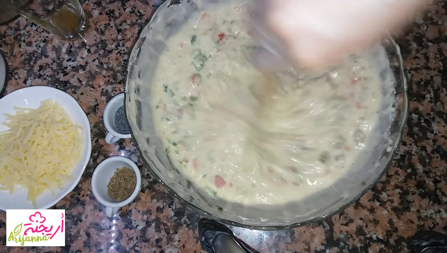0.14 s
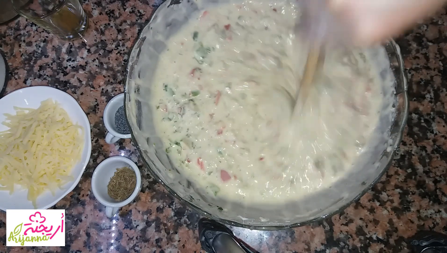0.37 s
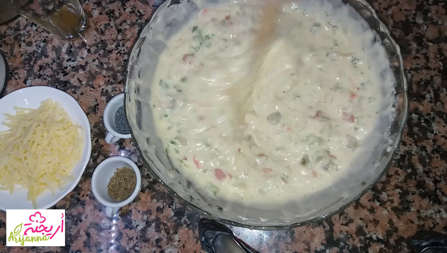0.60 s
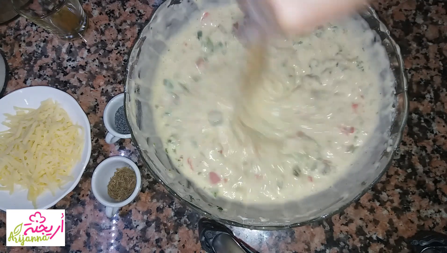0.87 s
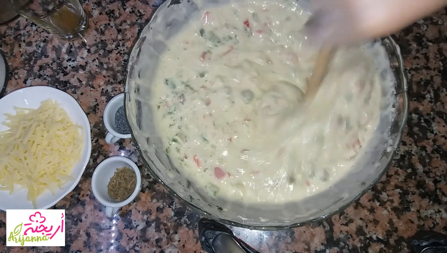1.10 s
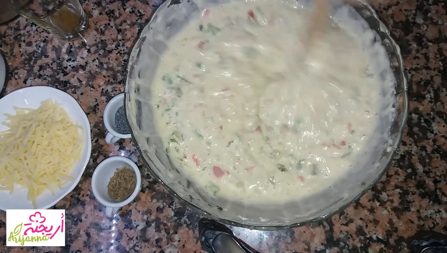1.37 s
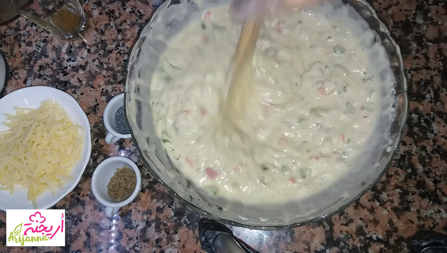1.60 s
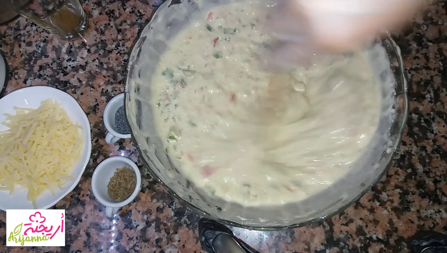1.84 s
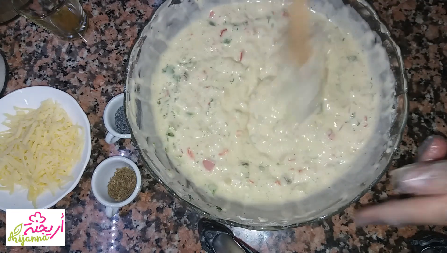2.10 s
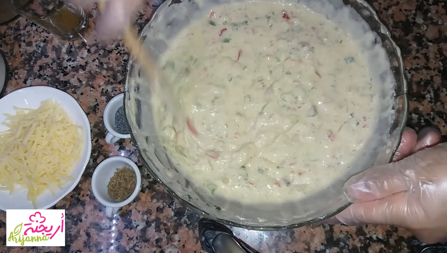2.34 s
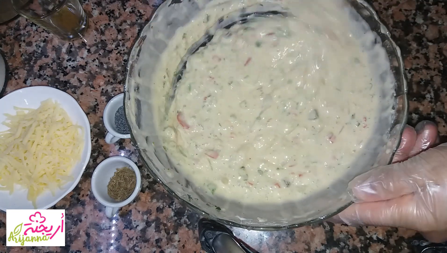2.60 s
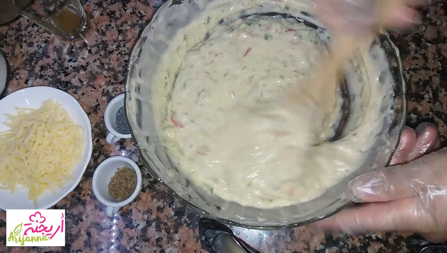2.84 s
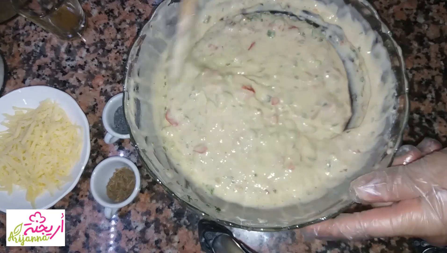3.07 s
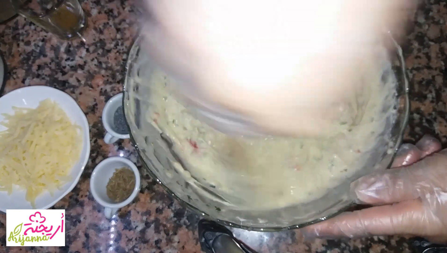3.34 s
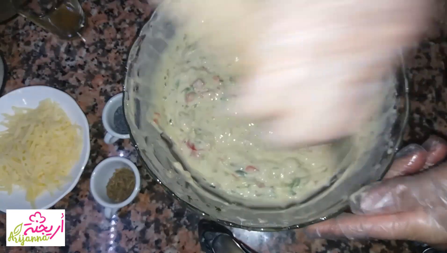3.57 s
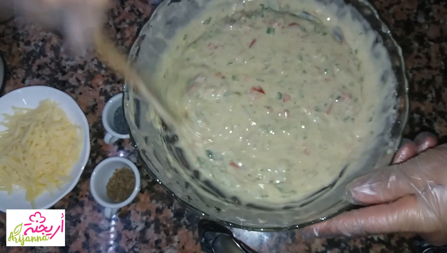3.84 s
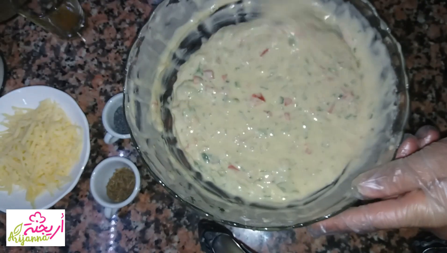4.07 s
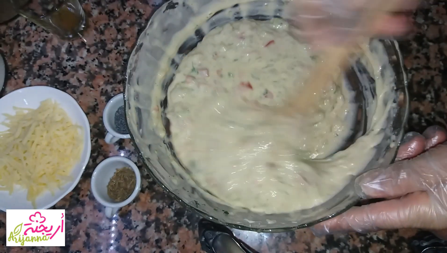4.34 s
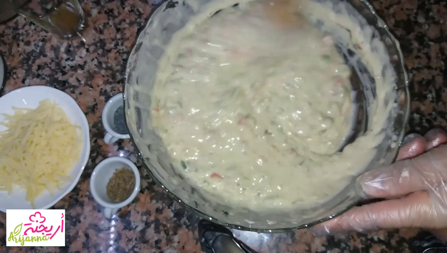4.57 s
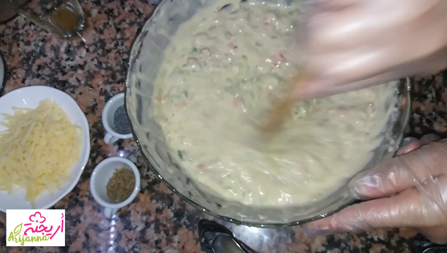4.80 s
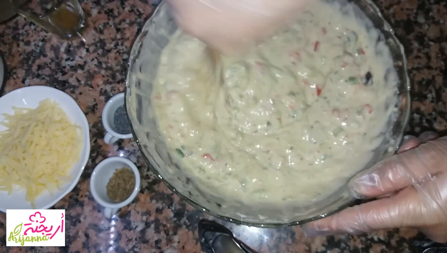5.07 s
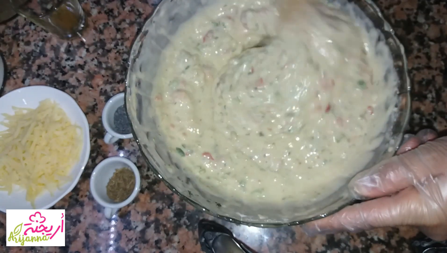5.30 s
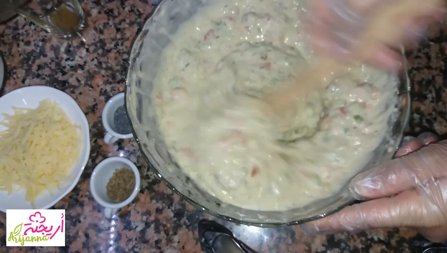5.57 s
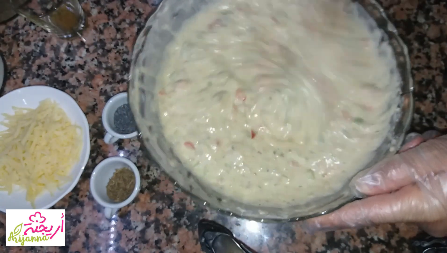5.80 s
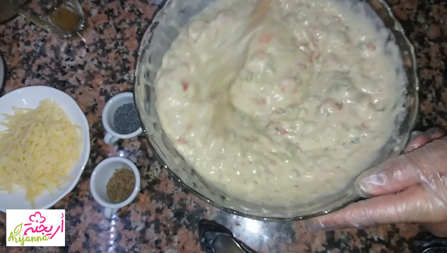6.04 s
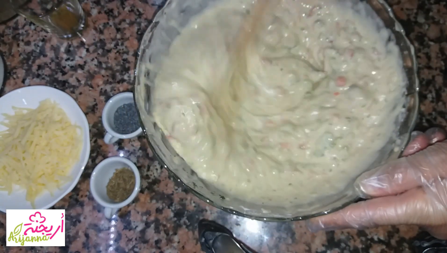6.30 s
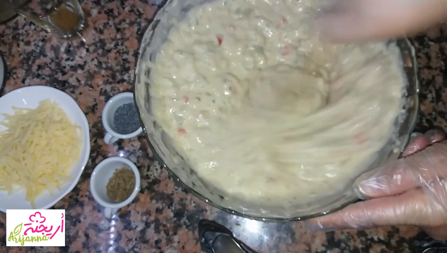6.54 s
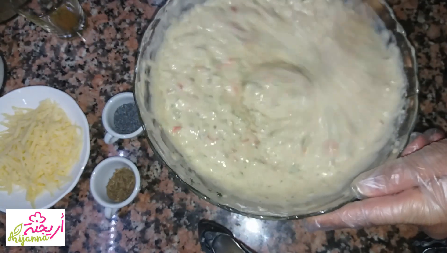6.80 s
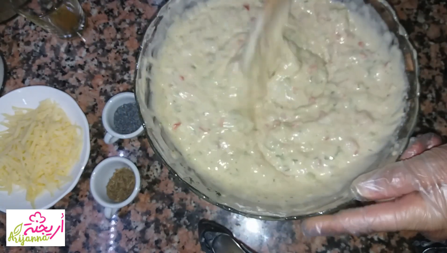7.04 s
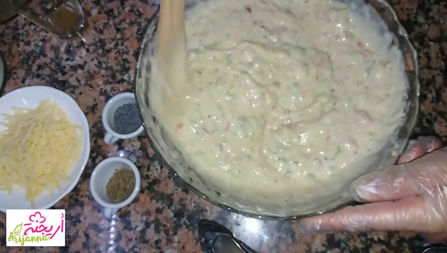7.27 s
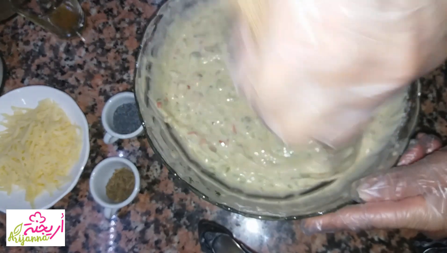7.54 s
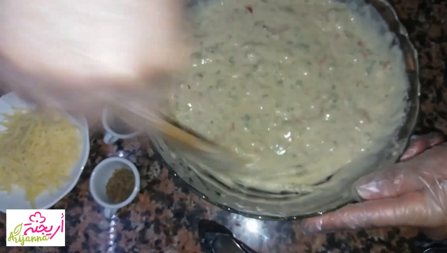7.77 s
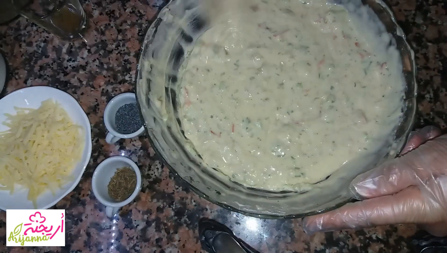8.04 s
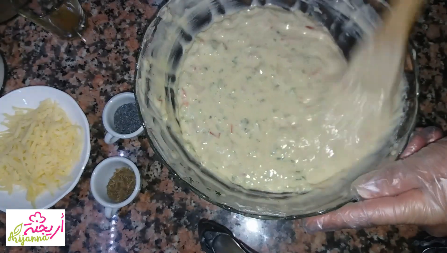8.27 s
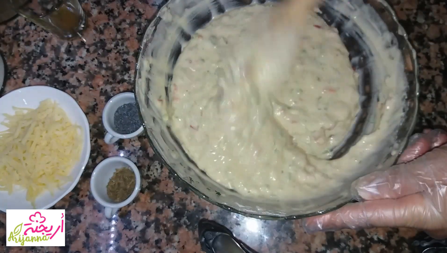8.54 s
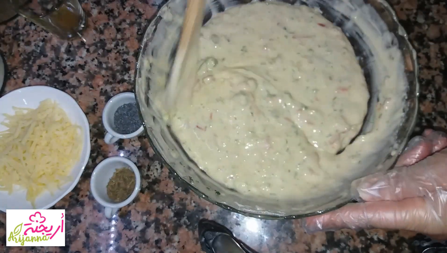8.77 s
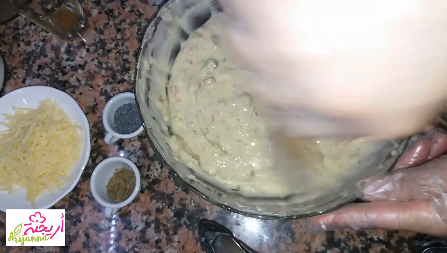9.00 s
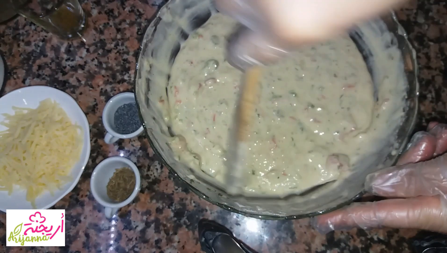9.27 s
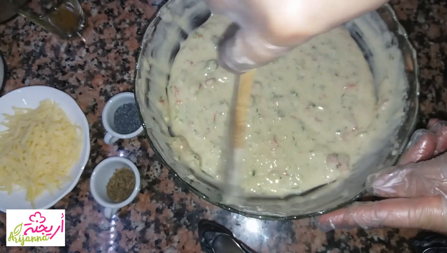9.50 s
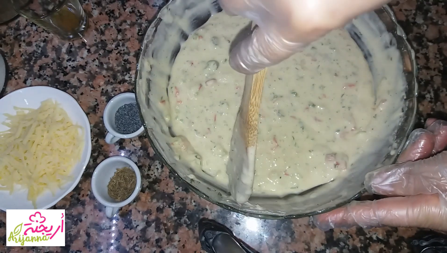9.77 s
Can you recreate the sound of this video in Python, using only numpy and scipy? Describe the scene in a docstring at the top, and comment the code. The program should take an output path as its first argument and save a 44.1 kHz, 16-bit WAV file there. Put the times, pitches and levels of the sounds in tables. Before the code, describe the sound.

A close mono microphone in a small kitchen with short echoes, over a very faint low hush and hum. From 0 to 1.8 s a wooden spoon moves through thick batter almost silently: soft slops, tiny air pops and barely audible touches. A small muffled cluster of knocks comes at 1.9 s. From 2.4 to 2.8 s the spoon rattles along the ribbed glass wall in a quick hollow run. After a pause, denser, harder clacking fills 3.3 to 4.3 s, woody with short glassy ringing. From 4.7 to 6.7 s the stirring turns soft and wet, with dull taps, squelches and bubble pops. A sudden hard double clack lands at 6.9 s, scattered knocks at 7.3 to 7.6 s, then the loudest clattering run at 7.8 to 8.3 s. A smaller rattle at 9.0 to 9.2 s fades to faint touches. Thin plastic glove crackle flickers throughout.

```python
"""Stirring batter in a glass bowl

A wooden spoon stirs thick batter in a fluted glass bowl on a stone counter in a kitchen.
Dragged along the wall, it knocks from rib to rib: short falling wood tones set the modes of the glass ringing.
The batter slops as lumpy filtered noise, and air pockets burst in it as rising pops and faint steady clicks.
A thin plastic glove crackles in clumps of tiny clicks. The kitchen echoes through feedback delays,
over a faint hush of noise, a hum and a thin whistle that comes and goes."""
import sys
import numpy as np
from scipy import signal
from scipy.fft import rfft, irfft, next_fast_len
from scipy.io import wavfile

SR = 44100
rng = np.random.default_rng(int(sys.argv[2]) if len(sys.argv) > 2 else 0)


def gain_from_db(level_db):
    """Convert decibel levels to linear amplitude factors (20 dB per decade)."""
    decades = np.asarray(level_db, float) / 20
    return 10 ** decades


def dump(signal):
    """Clip the signal to [-1, 1] and save it as 16-bit WAV at the path in sys.argv[1]."""
    limited = np.clip(np.atleast_2d(signal).T, -1, 1)
    pcm = np.round(limited * 32767).astype(np.int16)
    wavfile.write(sys.argv[1], SR, pcm)


N = 435708  # length of the scene in samples

# Spoon on glass, mostly a blow on a rib and a quick second touch:
# (time [s], relative level [dB], pitch the wood settles to [Hz])
SPOON_KNOCKS = [(0.0302,-44.5,1080),(0.636,-56,1170),(0.667,-54,1130),(1.386,-51,1120),(1.4105,-42.5,1236),(1.5962,-43,890),(1.655,-38,1670),(1.6823,-40,1080),
                (1.8617,-31.5,740),(1.872,-23.5,1018),(1.8883,-19,978),(1.901,-26,901),(2.035,-36,1190),
                (2.3677,-26.5,1020),(2.393,-33,1060),(2.434,-22.5,1140),(2.4546,-14,1280),(2.4867,-12,1340),(2.505,-10,1400),
                (2.5356,-10.5,1480),(2.5566,-16,1030),(2.5954,-17.5,1190),(2.6176,-18.5,1020),(2.6462,-10,1060),(2.6626,-10,1115),
                (2.6872,-12,1130),(2.7018,-13,870),(2.7263,-10,940),(2.7395,-16.5,954),(2.7678,-14.5,893),(2.785,-18,880),(3.016,-30.5,2940),(3.178,-45,1100),
                (3.2791,-20,1076),(3.3254,-18,904),(3.364,-17.5,1010),(3.3786,-7.5,1002),(3.4058,-10.5,1280),(3.423,-9.5,1190),
                (3.45,-10,1245),(3.4698,-15,1010),(3.495,-4.5,1040),(3.514,-29,1060),
                (3.6345,-11.5,1400),(3.678,-15,1370),(3.6989,-7.5,1500),(3.73,-7.5,1570),(3.745,-13,1150),(3.772,-11,2300),
                (3.7864,-8.5,2330),(3.814,-12.5,1750),(3.8311,-11,1100),(3.8619,-11,1190),(3.8798,-6,2210),(3.9027,-11.5,1383),
                (3.9622,-7.5,1270),(3.9777,-10.5,1260),(4.012,-8,1280),(4.039,-20,1290),(4.0685,-6.5,1250),(4.082,-7,1210),
                (4.1063,-8.5,1080),(4.15,-11,1040),(4.1919,-6,1000),(4.2065,-10,956),(4.231,-6.5,962),(4.245,-10,857),
                (4.293,-17,1450),(4.3426,-19,1416),(4.3774,-18,1350),(4.4626,-40,1650),
                (4.726,-37,1126),(4.8497,-24,730),(4.876,-29,530),(4.974,-32,980),(4.9963,-26,923),(5.0409,-23,1020),(5.08,-19.5,1350),
                (5.117,-35,1340),(5.133,-19.5,1320),(5.157,-29,820),(5.181,-49,1210),(5.212,-34.5,623),(5.28,-23,1415),(5.3367,-31.5,1340),(5.387,-35,1205),
                (5.4876,-33,900),(5.4986,-32,908),(5.5526,-26,982),(5.6042,-26,930),(5.634,-15,1015),(5.651,-21.5,1053),
                (5.91,-38,910),(5.9671,-23,1062),(6.0,-30,1030),(6.0264,-23,1025),(6.27,-19,1054),(6.3384,-28,1030),
                (6.597,-35,1060),(6.6254,-17,962),(6.6491,-20,1270),(6.789,-41.5,920),(6.809,-37.5,920),(6.852,-25.5,994),(6.901,-26,1120),(6.9131,-5,1030),
                (6.921,-7.5,1203),(6.9356,-4.5,1020),(6.9427,-6,1254),(6.957,-34,1280),(6.9929,-25,1025),
                (7.3217,-9.5,1610),(7.337,-22,1060),(7.3625,-16.5,1030),(7.4027,-19,993),(7.4212,-16,1610),(7.454,-19.5,1350),
                (7.474,-17.5,1200),(7.5128,-11.5,1270),(7.5368,-19.5,970),(7.5647,-4.5,1088),(7.593,-19,1015),
                (7.69,-19,1380),(7.782,-11,1500),(7.81,-11.5,1515),(7.825,-9,1605),(7.8535,-11.5,1010),(7.9445,-15.5,1280),
                (7.97,-13,1350),(8.005,-10.5,1356),(8.0331,-14,1410),(8.0636,-3,1420),(8.0856,-11,1400),(8.123,-3,1410),
                (8.14,-6.5,1284),(8.164,-2.5,1340),(8.1808,-10,1020),(8.2139,-6,1154),(8.2307,-8.5,1000),(8.2586,-4,1057),
                (8.274,-10,1120),(8.3107,-14,874),(8.3278,-10,813),(8.38,-17,1424),(8.4193,-19.5,780),
                (8.951,-26.5,970),(8.9581,-15,995),(8.9905,-16.5,1900),(9.0393,-14,1430),(9.063,-13.5,1370),(9.1,-9,1550),
                (9.117,-10,1046),(9.163,-12,1525),(9.1887,-18.5,970),(9.4276,-21,1055),(9.647,-39.5,933)]
# Strokes of the spoon; hard along the bare wall, soft under the batter: (start [s], length [s],
# low ring of the glass at both ends [dB], low ring in the middle [dB], hardness as upper partials [dB])
SPOON_STROKES = [(0, 2.22, 14, 5, -37), (1.52, 0.26, -6, -14, 1.5), (1.777, 0.19, 15, -1.5, -40),
                 (1.97, 0.3, -22, -31, 5.5), (2.295, 0.61, 6, -14, 1.5), (2.92, 0.57, -18, -16, 3.5),
                 (3.23, 1.3, 0, -16, 0), (3.556, 0.4, -15, -6.5, -2.5), (3.907, 0.41, -6.5, -15, -2),
                 (4.418, 0.17, 13, 7, -17), (4.62, 1.2, 4, -5, -16.5), (5.253, 0.36, -18, -0.5, -8),
                 (5.419, 0.26, 0, 3, -43), (5.82, 0.74, 16.5, -12.5, -16), (6.17, 0.54, -23, 2, -20),
                 (6.505, 0.41, -27, -5, -20), (6.767, 0.56, 10, -14, -26), (7.208, 0.44, -31, -0.5, -2.5),
                 (7.627, 0.82, -6, -10, 2), (7.918, 0.46, -14.5, -17.5, 1), (8.782, 0.48, -27.5, -1.5, -6),
                 (9.3, 0.3, 0, -2.5, 11), (9.561, 0.63, 13.5, -2, -20)]
# Modes of the bowl, before the load shifts or shortens them: (frequency [Hz],
# relative level damped by its load [dB], time to fall 60 dB [s], relative level struck on the clean rim [dB])
BOWL_MODES = [(431.6, 4.5, 0.041, -0.5), (525.5, -1.5, 0.1, -18), (922, -4, 0.11, -18.5),
              (996, 7.5, 0.024, -8), (1400, 2.5, 0.023, -14), (1610, -3, 0.064, -1.5), (2270, -8, 0.04, -6),
              (2418, -2, 0.036, -3.5), (3300, -26, 0.084, -16), (4330, -25.5, 0.066, -18),
              (5380, -28.5, 0.05, -33)]
# The spoon meets the clean rim: (time [s], relative level [dB])
CLEAN_RIM_TAPS = [(3.451, -25.5), (3.745, -24), (8.9585, -37), (9.099, -29.5), (9.4271, -36)]
# The mass of batter heaves: (time [s], peak level [dB])
BATTER_SURGES = [(0.02, -47), (1.43, -52), (1.9, -42), (2.82, -40.5), (3.42, -39), (3.77, -45.5),
                 (4.27, -34.5), (4.89, -41), (5.2, -42), (5.42, -45.5), (5.64, -39), (6.0, -39),
                 (6.4, -39.5), (6.68, -39), (6.94, -37), (7.48, -39.5), (7.95, -42), (8.38, -39),
                 (9.12, -41), (9.52, -48.5)]
# Tone colour of the batter: (frequency [Hz], relative level per Hz [dB])
BATTER_COLOUR = [(40, -14), (70, -16.5), (128, 5.5), (190, -7), (270, -1), (450, -6.5), (900, -12.5),
                 (1800, -20.5), (4000, -31), (8000, -40)]
# Pockets of air bursting in the batter: (time [s], level [dB], starting pitch [Hz])
AIR_POCKETS = [(0.2416, -43, 2290), (0.2783, -50, 3180), (0.542, -49, 3480), (0.614, -46, 2400),
               (0.634, -41, 2070), (0.666, -48, 2120), (0.8744, -53, 2060), (0.9527, -42.5, 1800),
               (1.3007, -41.5, 3300), (1.709, -44, 3060), (4.78, -41, 2590), (5.795, -40, 1720),
               (5.8074, -36, 4350), (6.0756, -36, 2720), (6.121, -31.5, 3500), (6.386, -44, 2620),
               (6.4522, -50, 1740), (6.7675, -46, 1730), (6.867, -37, 1840)]
# The gloved hand shifts its grip: (time [s], peak level [dB])
GRIP_SHIFTS = [(0.1, -63), (1.2, -68), (1.72, -58.5), (1.95, -70), (2.58, -50.5), (2.85, -58.5),
               (3.47, -55), (3.85, -49.5), (4.55, -53.5), (4.93, -54), (5.2, -59.5), (5.83, -54.5),
               (6.4, -61.5), (6.8, -58), (7.45, -57.5), (7.9, -53.5), (8.55, -59.5), (9.1, -71)]
# Glove creases snapping: (time [s], relative level [dB])
CREASE_SNAPS = [(2.028, -42), (2.6218, -37.5), (2.637, -59), (3.303, -40.5), (3.479, -37), (4.4645, -37),
                (4.8373, -44), (5.5926, -44.5), (5.605, -42), (6.061, -45.5), (6.27, -36), (6.5965, -41),
                (6.9061, -42.5), (7.5693, -40), (7.724, -43.5), (7.8747, -30.5), (7.901, -45.5),
                (7.9175, -48.5), (8.9535, -37.5), (9.205, -41)]
# Tone colour of the glove's crackle: (frequency [Hz], relative level per Hz [dB])
GLOVE_COLOUR = [(2000, -2), (4500, 0.5), (7000, 0), (9000, -9), (12000, -8.5), (16000, -10.5)]
# Tone colour of the room's hush: (frequency [Hz], relative level per Hz [dB])
ROOM_COLOUR = [(18, -51.5), (30, -12.5), (43, 0.5), (103, 12), (189, -33), (239, -33.5), (345, -13.5),
               (702, -30.5), (3580, -28.5), (6900, -28.5), (8520, -25), (14800, -27), (16000, -78.5)]
# Appliance tone: (frequency [Hz], usual rms level [dB])
APPLIANCE_HUM = [(199.5, -66)]
# A faint thin whistle comes and goes: (time [s], peak level [dB])
WHISTLE_SWELLS = [(0.92, -65), (1.1, -73), (2.15, -75), (3.1, -76), (8.85, -74)]

# Late in a stroke (share of its length) the spoon slides under the batter and softens
SINK_FROM, SINK_DB = 0.76, -13
# A second touch follows within this time; factor on the low ring in dB, change of hardness
SECOND_TOUCH_S, SECOND_SMOTHER, SECOND_HARDNESS_DB = 0.0212, 1.47, -0.5
HARDNESS_SPREAD_DB = 2.0
# A knock starts sharp by this share of its pitch, then settles; its upper partial fades sooner
CHIRP, CHIRP_S, UPPER_T60_S = 0.24, 0.0007, 0.0093
# After a blow the spoon skids on in tiny slips
JUDDER_DB, JUDDER_T60_S, JUDDER_PER_S = -11, 0.11, 2500
# Batter squeezed off the blade, starting at the pitch of the knock
SLAP_DB, SLAP_T60_S, SLAP_WIDTH_HZ = 17.5, 0.083, 194
# In soft strokes the lowest ring sits higher, by at most this share of its pitch
SOFT_LIFT = 0.1
# The rim rings on faintly after a blow: level, factor on the ring time, unsteadiness
LINGER_DB, LINGER_LONGER, LINGER_WAVER_DB = -16, 3.86, 5.5
RIM_T60_S, RIM_WAVER_DB = 0.26, 5.0
SURGE_RISE_DB_PER_S, SURGE_FALL_DB_PER_S, STILL_DB = 95.5, 85, -57
POCKET_SPREAD_DB = 3.0
GRIP_RISE_DB_PER_S, GRIP_FALL_DB_PER_S, SLACK_DB = 43, 45.5, -71
# The echo lasts this long in the bass and less above the cut
KITCHEN_T60_S, WALL_CUT_HZ, KITCHEN_DB = 0.37, 5800, -17.5
ROOM_HUSH_DB = -62
WHISTLE_HZ, WHISTLE_FADE_DB_PER_S, WHISTLE_REST_DB = 1663, 70, -88
OVERLOAD = 0.9  # the loudest peaks are rounded towards this height


def rms_one(x):
    """Scale to unit rms."""
    return x / np.sqrt(np.mean(x ** 2) + 1e-20)


def drift(corner_hz):
    """Slow chance of spread 1: noise at every 40th sample through two equal low-passes in a row."""
    r = np.exp(-80 * np.pi * corner_hz / SR)
    noise = rng.standard_normal(N // 40 + 2002)
    slow = signal.lfilter([1], [1, -2 * r, r * r], noise)[2000:]  # skip the start-up
    return np.interp(np.arange(N) / 40, np.arange(len(slow)), rms_one(slow))


def colour(x, spectrum):
    """Give a signal a spectrum drawn on a log-frequency axis; rms 1."""
    size = next_fast_len(N)
    hz, level_db = np.transpose(spectrum)
    grid = np.arange(1, size // 2 + 2) * SR / size
    gain = gain_from_db(np.interp(np.log(grid), np.log(hz), level_db))
    return rms_one(irfft(rfft(x, size) * gain, size)[:N])


def band(x, order, low_hz, high_hz):
    """Keep only the sound around and between two frequencies."""
    return signal.sosfilt(signal.butter(order, [low_hz, high_hz], "band", fs=SR, output="sos"), x)


def grains(per_s, spread_db):
    """Random clicks with a long-tailed spread of sizes."""
    sizes = gain_from_db(spread_db * np.minimum(rng.exponential(1, N), 5)) * rng.choice([-1, 1], N)
    return sizes * (rng.random(N) < per_s / SR)


def ring(clicks, hz, t60):
    """A unit click sets a fading sine ringing, of height 1 at the start."""
    r, w = gain_from_db(-60 / (t60 * SR)), 2 * np.pi * hz / SR
    return signal.lfilter([0, np.sin(w)], [1, -2 * r * np.cos(w), r * r], clicks + 1e-18)


def add(out, times, bursts):
    """Lay one short burst at each time."""
    for s, burst in zip(times, bursts):
        i = int(s * SR)
        out[i:i + len(burst)] += burst[:N - i]
    return out


def swells(rows, rise_db_per_s, fall_db_per_s, rest_db):
    """Level in dB of swells that climb to their peaks and fall away at set rates, added in power."""
    s, peak_db = np.transpose(rows)[:, :, None]
    t = np.arange(0, N + 64, 64) / SR
    slope_db = np.maximum(rise_db_per_s * (s - t), fall_db_per_s * (t - s))
    power = gain_from_db(peak_db - slope_db) ** 2
    level_db = 10 * np.log10(power.sum(axis=0) + gain_from_db(rest_db) ** 2)
    return np.interp(np.arange(N) / SR, t, level_db)


def knocks():
    """Each knock: a few cycles of wood, a tick and a skid of contact, the ringing glass and wet batter."""
    s, level_db, hz = np.transpose(SPOON_KNOCKS)[:, :, None]
    low_db, hard_db = contact(s[:, 0])
    t = np.arange(3072) / SR
    taper = np.cos(np.pi * t / t[-1] / 2)
    cycle = hz * (t + CHIRP * CHIRP_S * (1 - np.exp(-t / CHIRP_S)))
    build = 1 - np.exp(-cycle / 2)  # wet sounds gather over about two cycles
    noise = rng.standard_normal((len(s), len(t)))
    slips = (rng.random(noise.shape) < JUDDER_PER_S / SR) * np.sqrt(SR / JUDDER_PER_S) * noise

    tick = band(gain_from_db(hard_db - 13 - 60 * t / 0.009) * noise, 3, 1700, 3800)
    judder = gain_from_db(0.64 * hard_db + JUDDER_DB - 60 * t / JUDDER_T60_S) * taper * slips
    judder = band(judder, 4, 1000, 2900)
    glass, rim = bowl_ring(s, level_db, low_db, hard_db, t)
    glass = glass * taper * (1 - np.exp(-t / 0.00035))  # the wall takes up the blow

    # Soft blows land under the batter: a plop of noise replaces part of the ring
    wet = 1 / (6.0 + np.exp((hard_db - 0.5) / 6.5))
    plop = band(gain_from_db(low_db + 16.0 - 60 * t / 0.16) * build * noise[::-1], 2, 280, 900)
    lumpy_slips = slips[::-1] * (np.abs(noise) > 0.8)
    slap = batter_slap(low_db, hard_db, cycle, t, lumpy_slips) * build * taper

    blow = gain_from_db(7.0) * (wood(hz, hard_db, cycle, t) + tick) + judder
    blow = blow + (1 - wet) * glass + wet * plop + slap
    out = add(rim * gain_from_db(LINGER_WAVER_DB * drift(37.0)), s[:, 0], gain_from_db(level_db) * blow)
    # Too small to radiate bass
    return signal.sosfilt(signal.butter(4, 260, "high", fs=SR, output="sos"), out)


def contact(s):
    """Low ring and hardness of each knock from its place in its stroke."""
    rows = np.array(SPOON_STROKES)
    stroke = np.maximum(np.searchsorted(rows[:, 0], s) - 1, 0)  # the last stroke begun
    start, length, ends_db, middle_db, hard_db = rows[stroke].T
    place = np.clip((s - start) / length, 0, 1)
    second = np.diff(s, prepend=-1) < SECOND_TOUCH_S
    low_db = ends_db + (middle_db - ends_db) * np.sin(np.pi * place)
    low_db = low_db * np.where(second, SECOND_SMOTHER, 1)
    sunk = np.clip((place - SINK_FROM) * 10, 0, 1)
    hard_db = hard_db + SINK_DB * sunk + SECOND_HARDNESS_DB * second
    hard_db = hard_db + HARDNESS_SPREAD_DB * rng.standard_normal(len(s))
    return low_db[:, None], hard_db[:, None]


def wood(hz, hard_db, cycle, t):
    """The spoon's own tone dies in a few cycles; a hard blow adds more of its upper partial."""
    fade = (1 - np.exp(-cycle / 0.82)) * gain_from_db(-60 * cycle / 8.2)  # the contact takes a moment to build
    upper_hz = 2400 * (1 + 0.2 * rng.standard_normal(hz.shape))
    upper = np.sin(2 * np.pi * upper_hz * cycle / hz) * gain_from_db(-60 * t / UPPER_T60_S)
    return (np.sin(2 * np.pi * cycle) + gain_from_db(hard_db - 3) * upper) * fade


def bowl_ring(s, knock_db, low_db, hard_db, t):
    """Each blow rings the glass modes, which batter on the wall smothers, and the rim lingers faintly."""
    freedom = gain_from_db(0.21 * low_db)  # a smothered low ring goes with a shorter ring of every mode
    glass, rim = 0, 0
    for k, (mode_hz, mode_db, t60, _) in enumerate(BOWL_MODES):
        high = 1 / (1 + (1500 / mode_hz) ** 2)  # upper modes need a hard blow
        share_db = high * (hard_db + 0.24 * low_db) + (1 - high) * low_db
        strength, shift = rng.standard_normal((2, len(s), 1))
        level_db = share_db - 5 + mode_db + 1.5 * strength
        # The moving load shifts the low and the smothered modes most
        sway = 1 + (0.033 * (1 - high) + 0.036 / freedom) * shift
        if k == 0:
            sway = sway + SOFT_LIFT / (1 + np.exp((hard_db + 13.5) / 2.2) / 1.5)
        tone = np.sin(2 * np.pi * mode_hz * sway * t)
        glass = glass + (-1) ** k * gain_from_db(level_db - 60 * t / (t60 * freedom)) * tone
        linger = gain_from_db(knock_db + level_db + LINGER_DB + 0.43 * low_db)
        rim = rim + ring(add(np.zeros(N), s[:, 0], linger), mode_hz, LINGER_LONGER * t60)
    return glass, rim


def batter_slap(low_db, hard_db, cycle, t, lumpy_slips):
    """Batter squeezed off the blade: slow lumps of noise shake a tone that slides down."""
    coated = 1 / (0.5 + np.exp((hard_db + 2.5) / 13.0))  # a blade deep in batter slaps most
    lumps = signal.sosfilt(signal.butter(2, SLAP_WIDTH_HZ, fs=SR, output="sos"), lumpy_slips)
    fade = gain_from_db(SLAP_DB + 0.49 * low_db - 60 * t / SLAP_T60_S)
    return coated * fade * lumps * np.sin(2 * np.pi * cycle * (1 - 0.53 * t))


def rim_taps():
    """Undamped by batter, the glass rings long and unsteadily, clearest low and near 1.6 and 2.4 kHz."""
    s, level_db = np.transpose(CLEAN_RIM_TAPS)
    clicks = add(np.zeros(N), s, gain_from_db(level_db)[:, None])
    return sum(gain_from_db(rim_db + RIM_WAVER_DB * drift(45.0)) * ring(clicks, hz, RIM_T60_S)
               for hz, _, _, rim_db in BOWL_MODES)


def batter(drag_db):
    """Lumpy, grainy noise of the heavy mass; its bass and its wet middle come and go apart."""
    slop = colour(grains(1500, 1.55), BATTER_COLOUR)
    bass = signal.sosfiltfilt(signal.butter(2, 190, fs=SR, output="sos"), slop)
    middle = slop - bass
    return gain_from_db(drag_db) * (bass * gain_from_db(2.64 * drift(2.7)) + middle * gain_from_db(2.0 * drift(3.9)))


def pockets(drag_db):
    """Air bursts: clear rising pops from the table, and faint random clicks of steady pitch, louder in a surge."""
    s, level_db, hz = np.transpose(AIR_POCKETS)[:, :, None]
    t = np.arange(512) / SR
    pops = gain_from_db(level_db - 60 * hz * t / 17.0) * np.sin(2 * np.pi * hz * t * (1 + 8 * t))
    spray = gain_from_db(level_db - 2.5 - 60 * t / 0.036) * rng.standard_normal((len(s), len(t)))
    pops = pops + band(spray, 2, 1000, 4000)  # the film tears
    clicks = sum(ring(grains(4.5, POCKET_SPREAD_DB), click_hz, 3.3 / click_hz)
                 for click_hz in np.geomspace(1100, 3600, 3))
    return add(gain_from_db(-33 + 0.17 * drag_db) * clicks, s[:, 0], pops)


def glove(rustle_db):
    """Dense clumped crackle of the film, and sharper snaps of single creases."""
    s, level_db = np.transpose(CREASE_SNAPS)[:, :, None]
    t = np.arange(512) / SR
    snaps = gain_from_db(level_db + 7 - 60 * t / 0.02) * rng.standard_normal((len(s), len(t)))
    snaps = band(add(np.zeros(N), s[:, 0], snaps), 1, 4500, 9000)
    crackle = grains(2500 * gain_from_db(8.3 * drift(29)), 1.7)
    return snaps + gain_from_db(rustle_db) * colour(crackle, GLOVE_COLOUR)


def kitchen(x):
    """Twelve feedback delays, duller on every round, then all-passes that thicken the echoes."""
    size = next_fast_len(N + SR)
    w = 2 * np.pi * np.arange(size // 2 + 1) / size
    t60 = KITCHEN_T60_S / (1 + (w * SR / (2 * np.pi * WALL_CUT_HZ)) ** 2) ** 0.33
    response = 0
    for k, lag in enumerate((rng.uniform(0.006, 0.039, 12) * SR).astype(int)):
        turn = gain_from_db(-60 * lag / SR / t60) * np.exp(-1j * w * lag)  # one trip round the delay
        response = response + (-1) ** k * turn / (1 - turn)
    for lag in (47, 113, 211):
        delay = np.exp(-1j * w * lag)
        response = response * (delay - 0.6) / (1 - 0.6 * delay)
    return irfft(rfft(x, size) * response, size)[:N]


def room_tone():
    """Steady hush with a wavering appliance tone and a thin whistle."""
    t = np.arange(N) / SR
    hum = sum(gain_from_db(level_db + 1.0 * drift(0.57)) * np.sqrt(2) * np.sin(2 * np.pi * hz * t)
              for hz, level_db in APPLIANCE_HUM)
    whistle_db = swells(WHISTLE_SWELLS, WHISTLE_FADE_DB_PER_S, WHISTLE_FADE_DB_PER_S, WHISTLE_REST_DB)
    whistle = gain_from_db(whistle_db) * np.sin(2 * np.pi * WHISTLE_HZ * t)
    hush = gain_from_db(ROOM_HUSH_DB) * colour(rng.standard_normal(N), ROOM_COLOUR)
    return hush + hum + whistle


def scene():
    """Bowl and hand close by, the kitchen answering."""
    drag_db = swells(BATTER_SURGES, SURGE_RISE_DB_PER_S, SURGE_FALL_DB_PER_S, STILL_DB)
    rustle_db = swells(GRIP_SHIFTS, GRIP_RISE_DB_PER_S, GRIP_FALL_DB_PER_S, SLACK_DB)
    near = knocks() + rim_taps() + glove(rustle_db) + pockets(drag_db)
    echo = gain_from_db(KITCHEN_DB) * kitchen(near)
    return (near + echo + batter(drag_db) + room_tone())[None]


def roll_off(x):
    """The treble ends steeply here."""
    return signal.sosfilt(signal.butter(12, 16820, fs=SR, output="sos"), x)


def record(dry):
    """A small microphone rounds peaks, loses deep bass and dips around 9 kHz."""
    rounded = OVERLOAD * np.tanh(dry / OVERLOAD)
    thin = signal.sosfilt(signal.butter(3, 45, "high", fs=SR, output="sos"), rounded)
    b, a = signal.iirnotch(9000, 1.5, fs=SR)
    mix = thin + 0.6 * (signal.lfilter(b, a, thin) - thin)  # only part of the notch: a dip
    return roll_off(mix)


dry = scene()
out = record(dry)
dump(out)
```